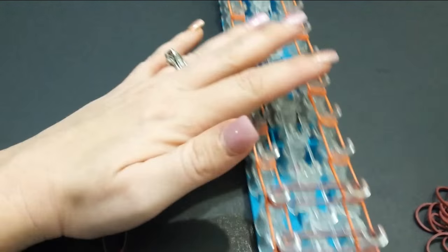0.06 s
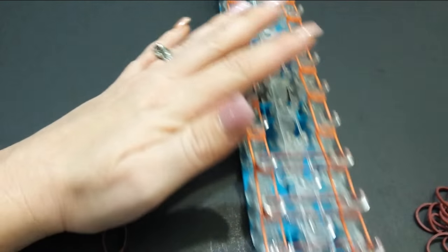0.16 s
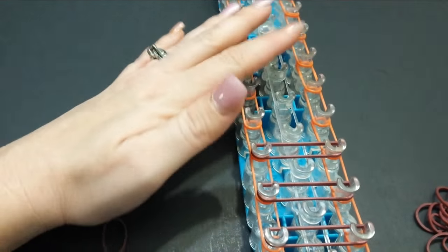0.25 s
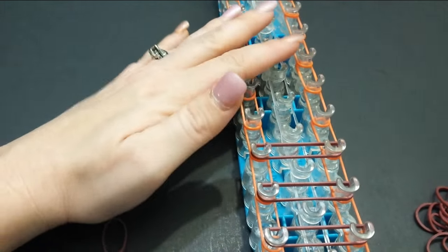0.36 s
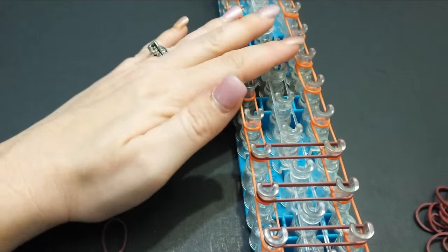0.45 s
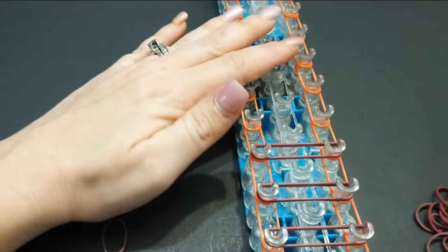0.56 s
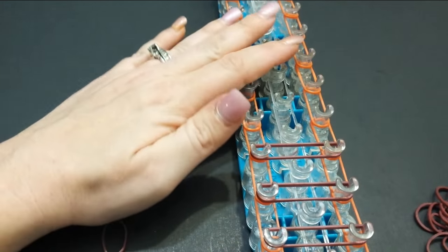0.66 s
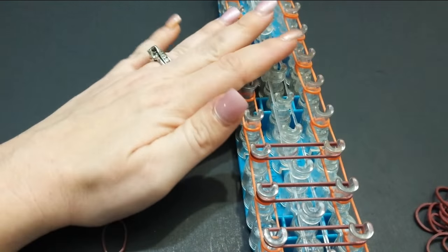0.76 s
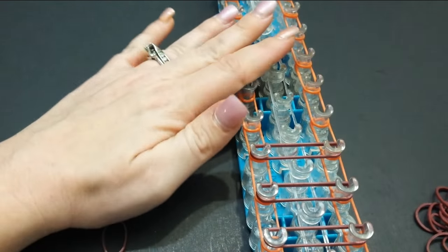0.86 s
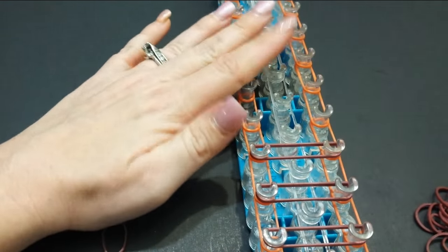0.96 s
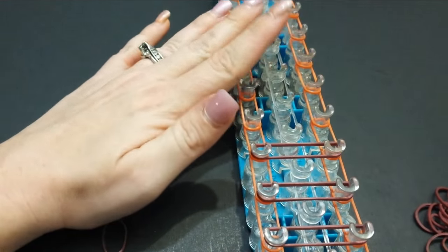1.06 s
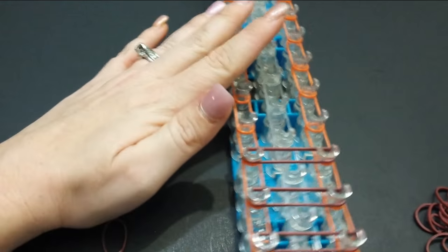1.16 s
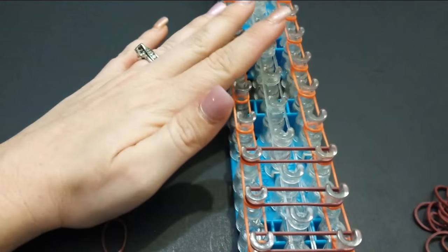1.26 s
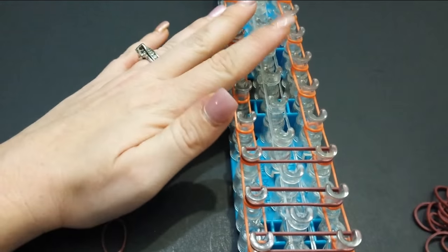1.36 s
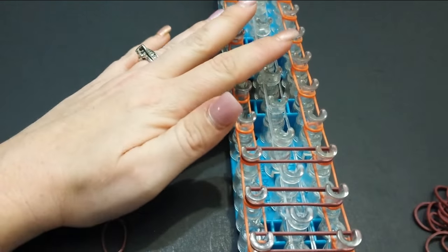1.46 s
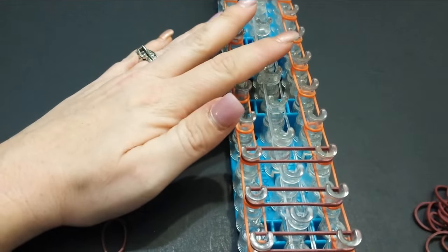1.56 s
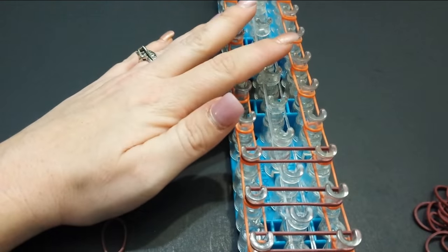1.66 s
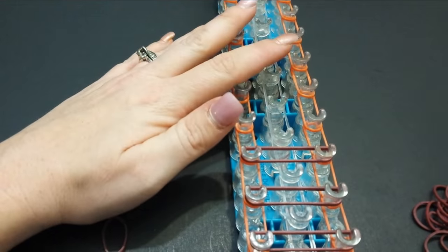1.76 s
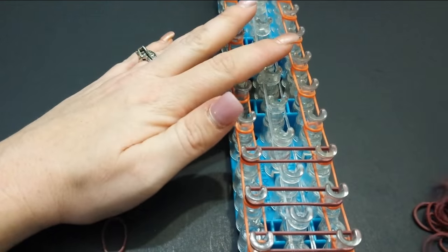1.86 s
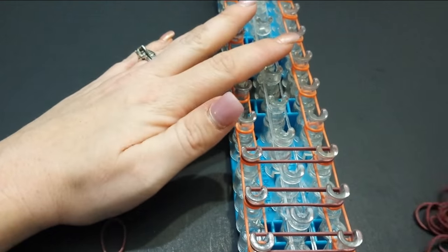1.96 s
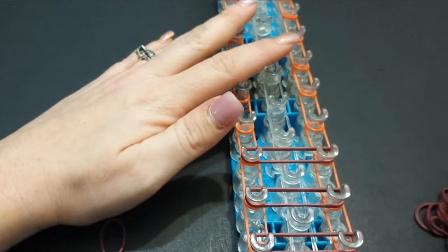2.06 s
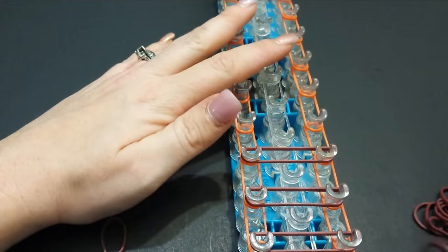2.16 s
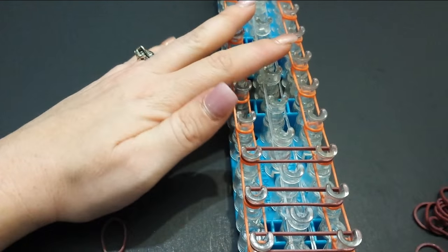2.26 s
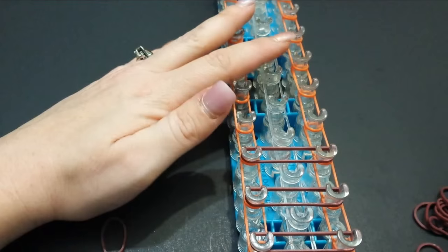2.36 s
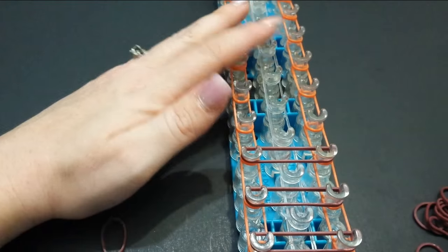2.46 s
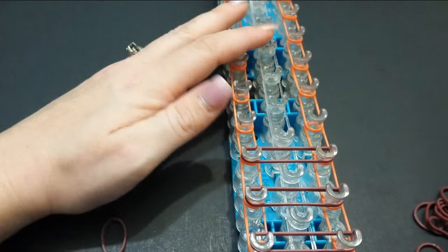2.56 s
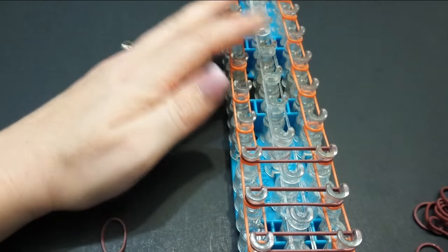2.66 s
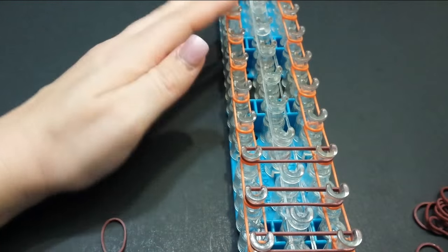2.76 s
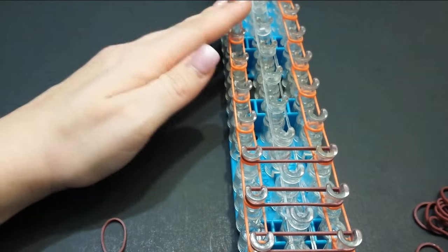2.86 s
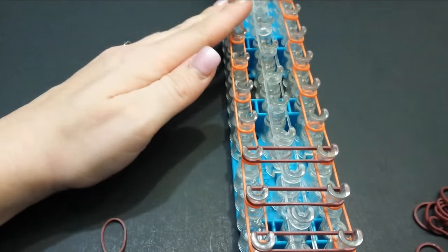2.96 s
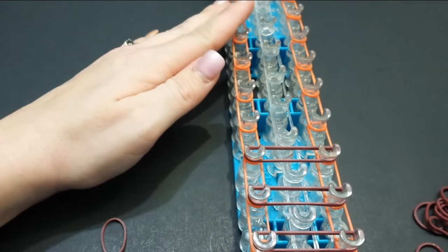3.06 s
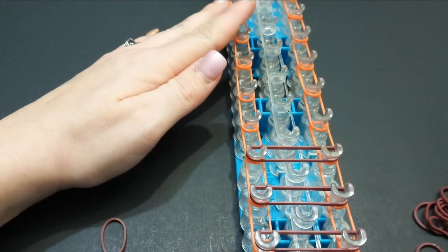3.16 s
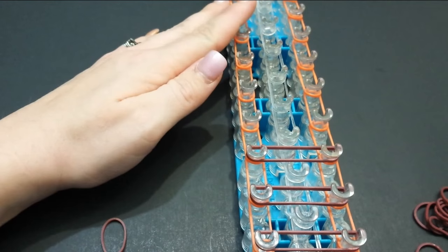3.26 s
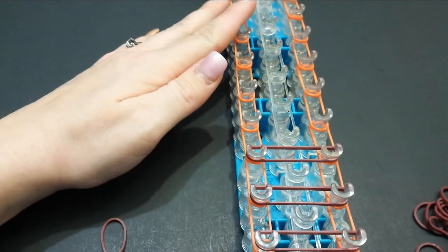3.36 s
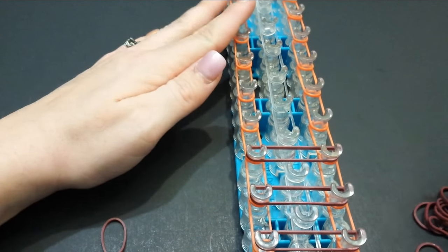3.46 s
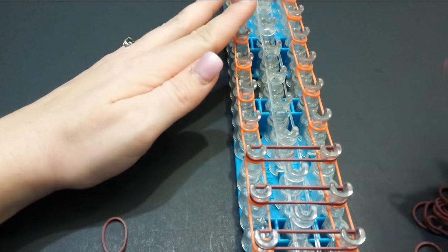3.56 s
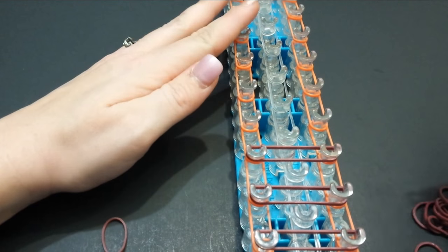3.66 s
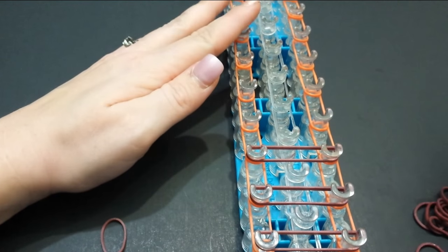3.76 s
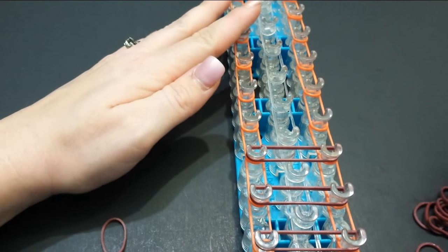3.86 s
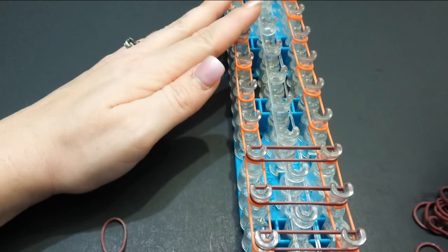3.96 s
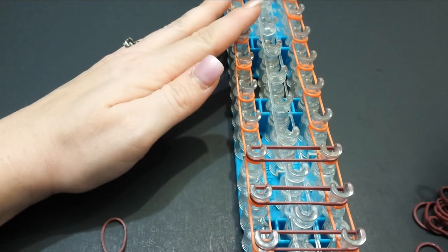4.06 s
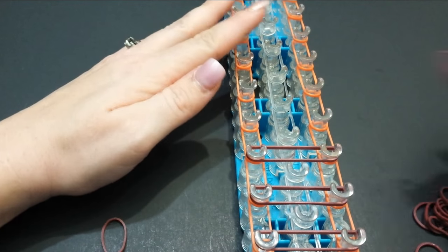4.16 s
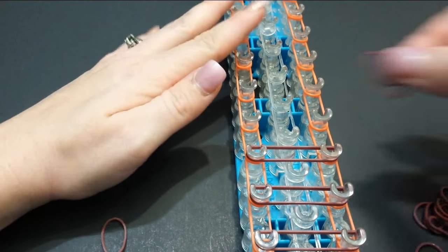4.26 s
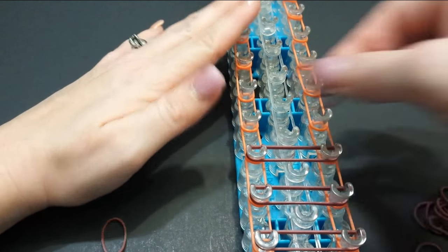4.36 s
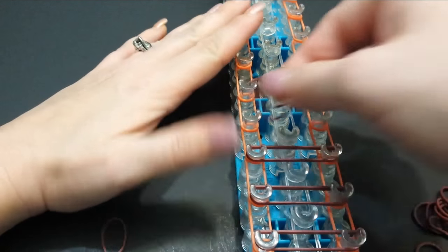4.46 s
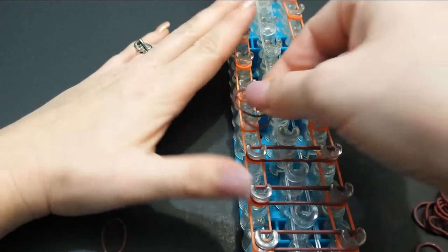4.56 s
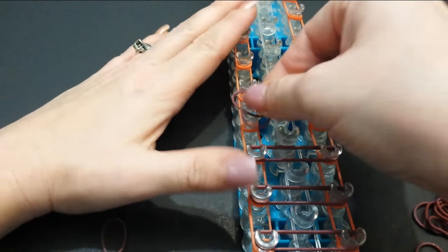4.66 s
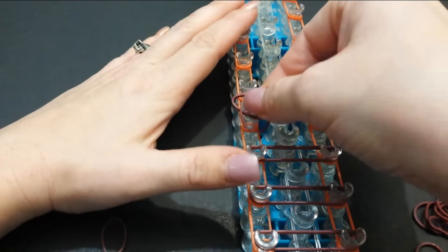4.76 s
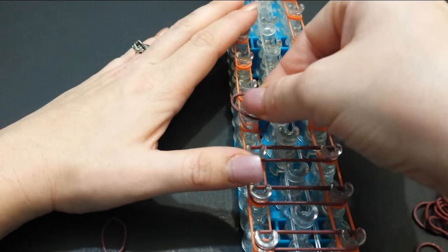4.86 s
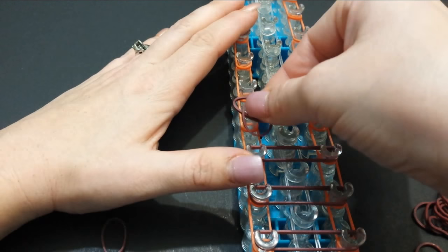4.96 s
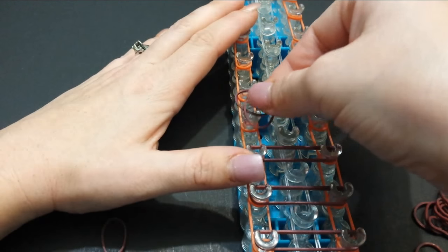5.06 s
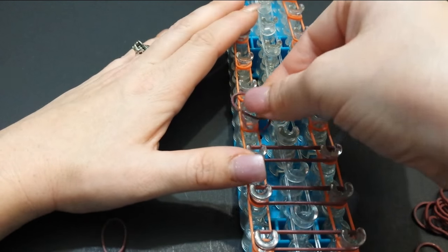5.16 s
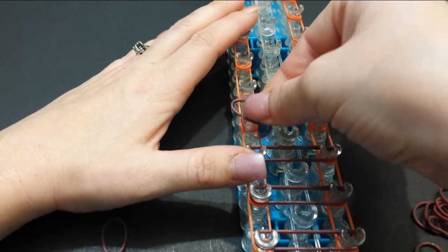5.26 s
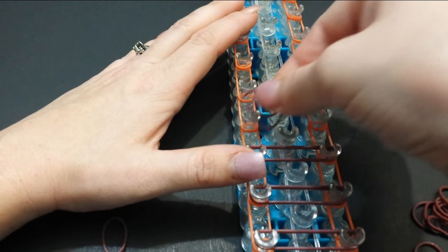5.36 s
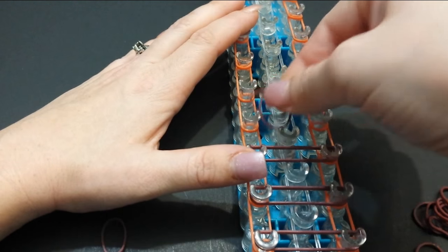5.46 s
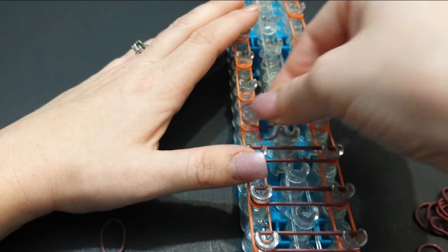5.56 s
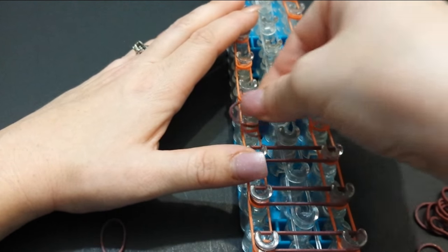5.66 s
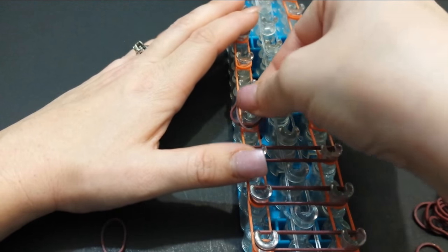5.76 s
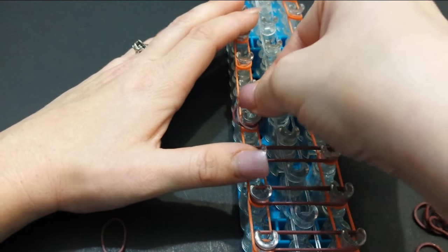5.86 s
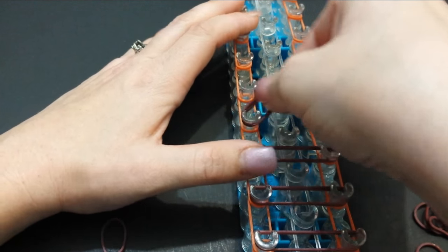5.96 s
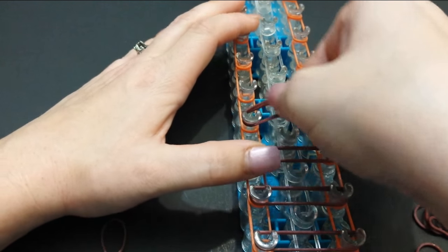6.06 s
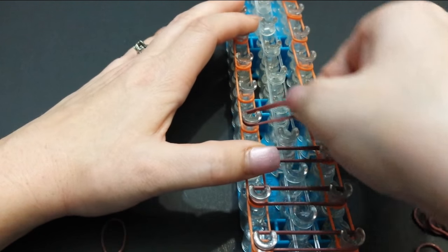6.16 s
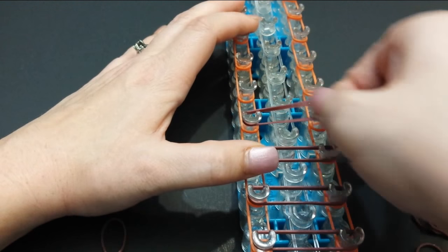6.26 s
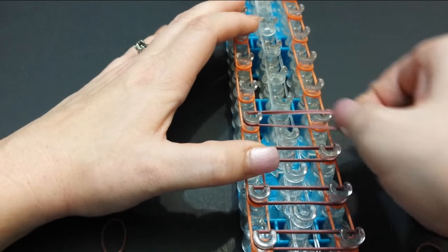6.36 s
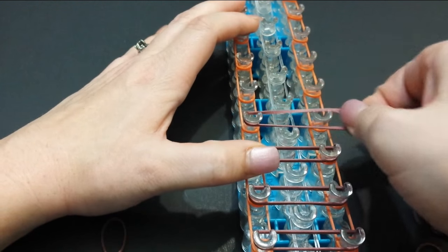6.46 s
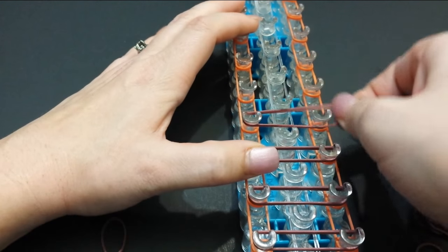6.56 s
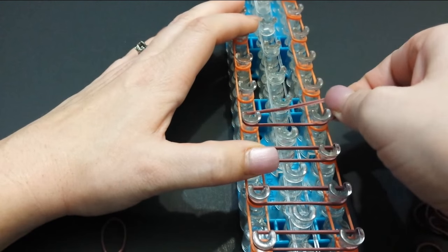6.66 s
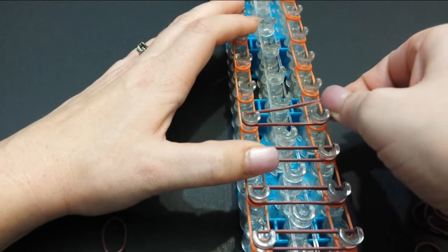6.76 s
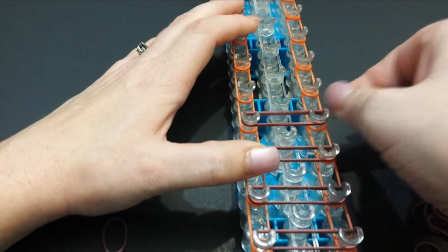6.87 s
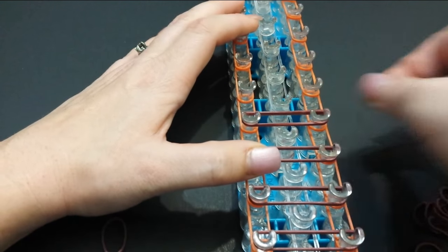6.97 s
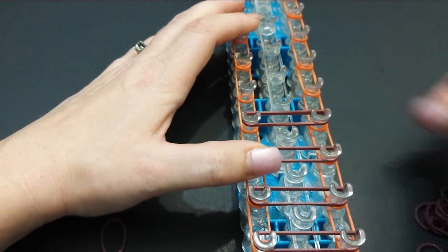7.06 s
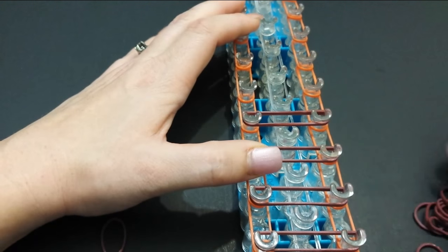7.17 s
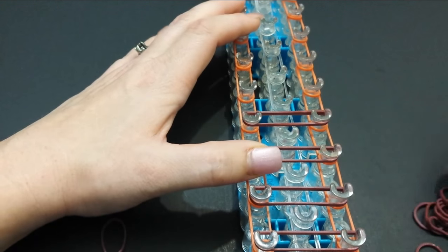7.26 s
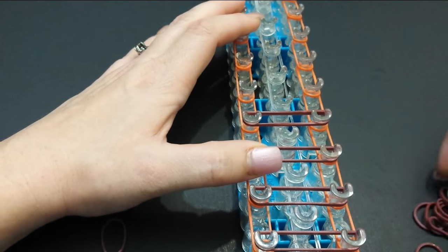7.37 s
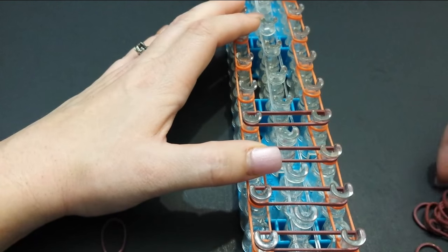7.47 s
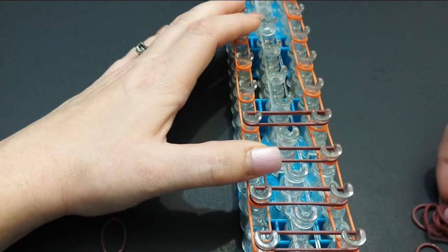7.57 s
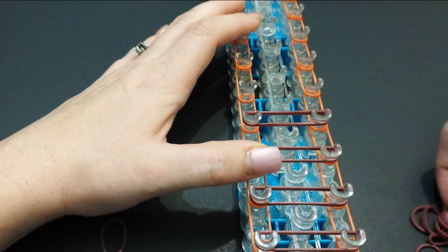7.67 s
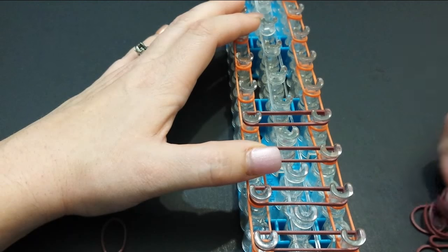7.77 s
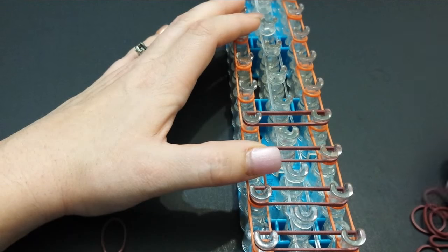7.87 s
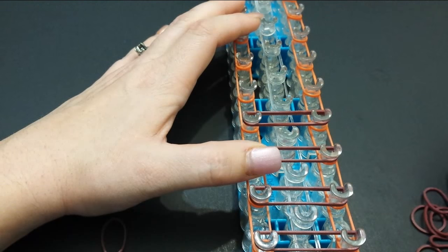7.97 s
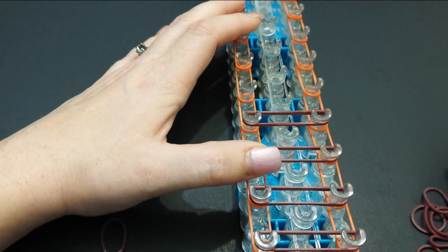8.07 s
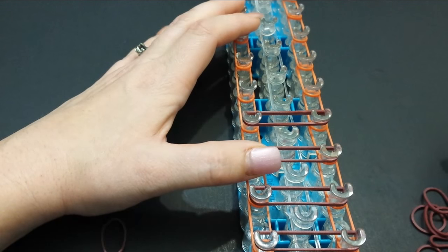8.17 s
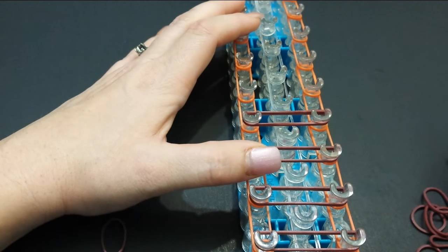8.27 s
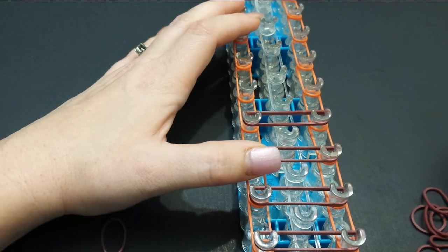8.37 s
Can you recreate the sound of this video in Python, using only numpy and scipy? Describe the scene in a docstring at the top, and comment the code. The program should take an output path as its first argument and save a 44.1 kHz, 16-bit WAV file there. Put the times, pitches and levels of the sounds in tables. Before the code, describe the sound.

Hands work at a plastic frame on a table, recorded very close and fairly dry, with sharp treble towards the right and duller sound on the left. Faint skin brushing and irregular nail ticks surround one strong hollow clack early on. Later come tiny crackles and crisp elastic snaps with brief plastic ringing, then sparse taps, all over steady low fan noise and faint hiss.

```python
"""In a small room, on a table close to the microphone, hands work at a clear plastic loom while a fan hums.
Rubbing skin is noise with an uneven grip; the base clacks and knocks as a noise crack and thud over decaying modes.
Nails, crackles and a rubber band stretched over two pins and snapping home are short bursts of contact noise
through plastic resonances, each with a ringing part; the band also shakes the rail that carries the pins.
The fan is shaped noise with wandering tones. One port faces the loom; the other hears it late and dull."""
import sys
import numpy as np
from scipy import signal
from scipy.fft import rfft, irfft, next_fast_len
from scipy.io import wavfile
from scipy.ndimage import uniform_filter1d, map_coordinates

SR = 44100
rng = np.random.default_rng(int(sys.argv[2]) if len(sys.argv) > 2 else 0)


def persist_wave(psi):
    """Save psi, clipped to +-1, as 16-bit WAV."""
    counts = np.round(np.clip(psi, -1, 1) * 32767).astype(np.int16)
    wavfile.write(sys.argv[1], SR, np.atleast_2d(counts).T)


N = 371763

# Fan air spectrum, relative: f/Hz, density level/dB
AIR_SPECTRUM = [(12, -76), (20, -13), (27, -27), (40, -9.5), (92, 1.5), (188, -9), (208, -14.5), (241, -7),
                (266, -18), (318, -15), (351, -20.5), (381, -13), (413, -17), (564, -29.5), (1000, -33.5),
                (1300, -41.5), (2200, -120)]
# Even hiss spectrum, relative: f/Hz, density level/dB
HISS_SPECTRUM = [(400, -23), (700, -8), (1300, -4), (1600, -5.5), (2600, -3.5), (3900, -6.5), (5500, -3),
                 (8300, -4), (10800, -9), (15200, -13.5), (15900, -35)]
# Fan tones: f/Hz, width of the pitch drift/Hz, level/dB
FAN_TONES = [(58.7, 6.65, -61), (80.4, 12.2, -56), (95, 6.83, -53), (120.8, 8.94, -65.5),
             (239.6, 4.756, -58), (320.3, 17.54, -67), (380.9, 7.51, -63.5)]
# Low rumble, of which only departures from the mean count: t/s, level/dB
RUMBLE_LEVEL = [(0.1, -41.5), (0.52, -48), (0.89, -43), (2.02, -47.5), (6.01, -45), (7.45, -50),
                (8.34, -43.5), (8.43, -46.5)]
# Coherence of diffuse noise between the ports: f/Hz, left-right likeness/1
COHERENCE = [(60, 1), (240, 0.97), (480, 1), (950, 0.41), (2000, 0.017), (15000, 0.037)]
# Shading of the loom at the left port: f/Hz, level/dB
LEFT_SHADE = [(300, 3.5), (1500, 3.5), (3200, 3), (5000, -2.5), (6700, -11), (8200, -21), (11000, -15),
              (15000, -10)]
# Reverberation of the room: f/Hz, T60/s
ROOM_T60 = [(200, 0.4), (3000, 0.16), (8000, 0.135), (15000, 0.09)]

# Strokes of skin: t of the middle/s, length/s, level/dB, share of power on table against loom/1
RUB_STROKES = [(0.098, 0.21, -58.5, 0.2), (0.191, 0.067, -58, 0.35), (0.283, 0.089, -45, 0.35),
               (0.542, 0.18, -64, 0.05), (0.918, 0.47, -62, 0.55), (1.138, 0.05, -63, 1),
               (1.34, 0.83, -60, 0.13), (2.05, 0.07, -65, 0.1), (2.333, 0.45, -61, 0.15),
               (2.8, 0.04, -77, .02), (2.993, 0.45, -60.5, 0.2), (4.762, 0.25, -64, 0.02),
               (5.848, 0.085, -60.5, 0), (6.156, 0.27, -61, 0.14), (6.376, 0.053, -63, 1),
               (6.52, 0.09, -61, 0.1), (6.7, 0.1, -57.5, 0.15), (7.667, 0.28, -59.5, 0.1)]
# Skin on the table, relative: f/Hz, density level/dB
SKIN_SPECTRUM = [(150, -13), (400, 3), (800, -1.5), (1500, -4.5), (2200, -5.5), (3200, -8), (5000, -6),
                 (8000, -6), (11000, -22), (15000, -57)]
# Resonances of the pins under a sliding finger: f/Hz, width/Hz, level/dB
SCRAPE_MODES = [(2690, 2040, -8), (5000, 1440, -2), (7600, 2100, 2.5), (9830, 4300, -4.5)]
STICKS_PER_S, STICK_DB = 55, 1.4  # uneven grip of the skin: knots a second, depth/dB
GRAINS_PER_S, GRAIN_DB = 600, 2.6  # fine grain over the pins: knots a second, depth/dB

# Clacks and knocks of the base: t/s, level/dB, hardness of the crack/dB
BASE_HITS = [(0.9774, -46.5, 20), (0.9845, -47, 6), (1.2994, -42, -3), (1.3027, -22, 0),
             (1.3223, -37.5, -1)]
# Resonances of the hollow base: f/Hz, width/Hz, level/dB
BASE_MODES = [(2690, 350, 0.5), (3460, 420, 3), (5700, 1040, -7.5), (8700, 2300, -15.5)]
# Modes of base and table top: f/Hz, level/dB, T60/s, left minus right/dB
TABLE_MODES = [(158, -2.5, 0.19, 0), (257, -14, 0.036, -1), (463, -11, 0.078, 2), (561, -2.5, 0.052, 19),
               (770, -16, .045, 14), (986, -8, 0.048, 12), (1244, -10, 0.066, 18), (1430, -11, 0.05, 20),
               (1694, -15, 0.053, 17)]
THUD_T60_S = 0.055

# Crackles of shifting fingers, creaking band and bands picked up:
# start t/s, end t/s, mean tick energy level/dB, f/Hz
CRACKLES = [(2.04, 2.09, -28.5, 3070), (2.095, 2.133, -41, 3070), (4.704, 4.801, -42, 7000),
            (6.06, 6.155, -43, 4900), (6.16, 6.192, -35.5, 4900), (6.21, 6.27, -43, 4800),
            (7.722, 7.83, -41, 3420)]
CRACKLES_PER_S, CRACKLE_SPREAD_DB = 200, 7
# Ticks of nails: t/s, energy level/dB, f of the struck part/Hz, its ring level/dB, push on the base/dB
NAIL_TICKS = [(0.9262, -11.5, 8600, 1, 8), (0.946, -29.5, 7550, -11, 28), (.9505, -33, 7700, -2, 0),
              (0.967, -0.5, 3430, -7, 5), (0.9773, -4.5, 3090, -1, 10), (0.993, -28, 3600, 3, 0),
              (1.1087, -15.5, 1580, -10, 14), (1.3650, -27, 7000, 1, -6), (1.632, -29, 7000, -6, -6),
              (1.9440, -24, 2950, -6, -8), (2.2596, -23.5, 2970, -3, -4), (2.3273, -20.5, 2650, 8, -12),
              (2.337, -19, 2740, 1, -10), (2.4677, -6.5, 7560, 4, -20), (2.4674, -16.5, 2570, 5, -14),
              (2.9694, -2.5, 7300, 11.5, 2), (2.9734, -17, 7360, 16, 8), (3.0055, -29, 7400, 2, -6),
              (3.194, -22.5, 7000, -9, 5), (3.265, -16, 7550, -6, -10), (5.4435, -23, 6850, 4, -6),
              (6.1995, -30, 8000, -8, -4), (6.241, -32, 4494, -2, -4), (6.924, -28, 4900, -6, 15),
              (7.552, -14.5, 3260, -1.5, -16), (8.0165, -17.5, 3500, -1, -14), (8.054, -31, 3300, 0, -6),
              (8.3473, -19.5, 3160, -6.5, 4)]
# Resonances of the frame: f/Hz, width/Hz, level/dB
FRAME_MODES = [(550, 630, -16), (1040, 130, -16), (1550, 330, -10), (2340, 550, -8), (2870, 114, 1),
               (3680, 380, -5), (5040, 970, -4.5), (5620, 360, -1), (6050, 950, 0.5), (7300, 1770, -0.5),
               (9000, 1400, -3), (11000, 890, -8.5), (12900, 3000, -24)]

# Slips and snaps of the band: t/s, energy level/dB, f of the struck pin/Hz, its ring level/dB,
# brightness/(dB per octave), push on the base/dB, creep before the slip/s,
# tuning of the loaded pins as a ratio/1, energy level in the rail/dB
BAND_SNAPS = [(6.157, -26.5, 1550, -8, -12, 6, 0.0022, 1.03, -38),
              (6.3361, -22.5, 4750, -1, -1, 8, .0004, 1.07, -42),
              (6.3484, -8, 8100, -7, 4, 5, .0002, 1, -26), (6.3915, 10.5, 7980, 4, 4.5, 1.5, .0004, 1, -21),
              (6.3997, -18, 8600, -4, -3, 8, .0003, 1.04, -30),
              (6.4197, 1.5, 8460, -4, 1, -13, .0003, 0.995, -15.5),
              (6.5632, 0, 7640, -10, -0.5, -0.5, 0.00046, .97, -37),
              (6.573, -23, 6200, 5, 0, -8, .0003, 1.1, -40),
              (6.6216, -2, 4820, 4, -7.5, -24, 0.00044, 0.96, -34),
              (6.6359, 3.5, 5260, -0.5, -0.5, -4, 0.0023, 0.99, -17),
              (6.6967, -24, 4730, -1, -9, -2, .0004, 0.94, -36),
              (6.9998, 8, 12000, -0.5, 4, -7, 0.00073, 1.06, -22),
              (7.0047, 6.5, 10500, -3.5, -.5, -4.5, .0007, 1, -10)]
# Resonances of the pins: f/Hz, width/Hz, level/dB
PIN_MODES = [(308, 19, -2), (1010, 400, -23), (1590, 350, -13.5), (3170, 210, -5.5), (3460, 300, -8.5),
             (4820, 530, 0), (5700, 380, -3), (6580, 510, 1), (7760, 410, 0), (8900, 520, -3.5),
             (10540, 740, -5), (12000, 1100, -11.5), (14700, 1700, -22)]
# Modes of the rail that carries the pins: f/Hz, level/dB, T60/s
RAIL_MODES = [(748, -14.5, 0.11), (966, -13, 0.088), (1600, -8, 0.063), (2800, -3, 0.053), (3240, 0, .08),
              (3680, -5, 0.088), (4200, -7, .06), (4760, -4, .04)]
RAIL_DETUNE, RAIL_WAVER = 0.005, 0.06  # pitch scatter as a ratio; random phase step, radians a sample
RATTLE_GAP_S, RATTLE_DB, RATTLE_LOSS_DB = 0.0075, -20, 1.8  # mean gap, first slap's energy, loss a slap
RATTLE_HZ, RATTLE_RING_DB, RATTLE_BRIGHT_DB = 5450, -1, 2  # slapped pin's pitch, ring; tilt per octave
CREEP_S = 0.0007  # growth time constant of a light contact's creep before it slips
LOOSE_PER_DB = 0.006  # a lighter contact chatters longer: growth of log decay time for each dB less
TOP_HZ = 16000


def amp(db):
    """Level law: decibels to amplitude gain."""
    return 10 ** (np.asarray(db) / 20)


def unit(x):
    """Power normalisation: x at rms 1."""
    return x / np.sqrt(np.mean(x ** 2) + 1e-20)


def along(points, hz):
    """Interpolation of (f/Hz, value) points on a logarithmic frequency axis."""
    f, v = np.transpose(points)
    return np.interp(np.log(hz + 1), np.log(f + 1), v)


def filtered(x, response):
    """Linear filtering: the spectrum of x times a complex response of frequency."""
    n = x.shape[-1]
    m = next_fast_len(n + SR // 8)  # room for the response to die away
    return irfft(rfft(x, m) * response(np.fft.rfftfreq(m, 1 / SR)), m)[..., :n]


def add(track, s, sound):
    """Superposition: mix a sound into a track at time s."""
    part = track[:, round(s * SR):][:, :sound.shape[-1]]
    part += sound[..., :part.shape[-1]]


def wobble(rate):
    """Random modulation: a smooth curve, rate knots a second."""
    knots = rng.standard_normal(N // 8)
    return map_coordinates(knots, [np.arange(N) * rate / SR], mode="wrap")


def rush(spectrum):
    """Diffuse field: stereo noise of rms 1 whose ports are coherent in the bass."""
    def mix(hz):
        turn = np.arccos(np.clip(along(COHERENCE, hz), -1, 1)) / 2
        return amp(along(spectrum, hz)) * np.array([np.cos(turn), np.sin(turn)])

    mid, side = filtered(rng.standard_normal((2, N)), mix)
    return unit(np.array([mid + side, mid - side]))


def left_lags(x, lag_ms):
    """Path difference: sound from the right reaches the left port later."""
    late = filtered(x[0], lambda hz: np.exp(-2j * np.pi * hz * lag_ms / 1000))
    return np.array([late, x[1]])


def shaded(x):
    """Directivity: the left port is turned away from the loom and loses its treble."""
    return np.array([filtered(x[0], lambda hz: amp(along(LEFT_SHADE, hz))), x[1]])


def wandering(hz, width):
    """Frequency modulation: a tone of rms 1 whose pitch drifts over about the given width."""
    drift = uniform_filter1d(rng.standard_normal(N), size=SR // 16)
    pitch = hz + unit(drift) * width / 2
    return unit(np.sin(2 * np.pi * np.cumsum(pitch) / SR))


def fan(air_db=-45.5, hiss_db=-60.3, follow=0.97, hiss_pan_db=-1.5):
    """Flow noise: low rushing air with unsteady tones from the right, over an even hiss."""
    tones = sum(amp(db) * wandering(hz, width) for hz, width, db in FAN_TONES)
    air = tones + amp(air_db) * rush(AIR_SPECTRUM)
    # only the deepest part drifts in level
    s, level = np.transpose(RUMBLE_LEVEL)
    drift = amp(follow * np.interp(np.arange(N) / SR, s, level - level.mean()))
    deep = filtered(air, lambda hz: 1 / (1 + (hz / 140) ** 6))
    air = air + (drift - 1) * deep
    hiss = amp(hiss_db) * rush(HISS_SPECTRUM) * amp([[hiss_pan_db / 2], [-hiss_pan_db / 2]])
    return left_lags(air + hiss, lag_ms=0.334)


def room(x, wall_s=0.0036, wall_db=-23, tail_db=-15.0):
    """Reverberation: a short diffuse tail, fading sooner in the treble, and one near-wall reflection."""
    hz, t, z = signal.stft(rng.standard_normal((2, SR // 3)), SR, nperseg=256)
    decay = amp(-60 * t / along(ROOM_T60, hz)[:, None])
    tail = signal.istft(z * decay, SR, nperseg=256)[1]
    tail *= amp(tail_db) / np.linalg.norm(tail[0])
    tail[:, round(wall_s * SR)] += amp(wall_db)
    return signal.fftconvolve(x, tail, axes=1)[:, :N]


def plastic(hz, modes):
    """Modal superposition: causal response of resonances of alternating sign."""
    response = 0
    for k, (centre, width, db) in enumerate(modes):
        damping = 1j * hz * width
        response = response + (-1) ** k * amp(db) * damping / (centre ** 2 - hz ** 2 + damping)
    return response


def rubs(pins_db=2, table_pan_db=3):
    """Friction: skin with an uneven grip slides on the table and scrapes in fine grains over the pins."""
    t = np.arange(N) / SR
    grip = amp(STICK_DB * wobble(STICKS_PER_S))
    grains = rng.standard_normal((2, N)) * grip * amp(GRAIN_DB * wobble(GRAINS_PER_S))
    pins = amp(pins_db) * shaded(unit(filtered(grains, lambda hz: plastic(hz, SCRAPE_MODES))))
    table = unit(rush(SKIN_SPECTRUM) * grip) * amp([[table_pan_db / 2], [-table_pan_db / 2]])
    on_table, on_pins = np.zeros(N), np.zeros(N)
    for s, length, db, share in RUB_STROKES:
        stroke = amp(db) * np.exp(-2 * ((t - s) / length) ** 2)
        share = np.clip(share, 0, 1)
        on_table += stroke * np.sqrt(share)
        on_pins += stroke * np.sqrt(1 - share)
    return table * on_table + pins * on_pins


def base_hits(crack_db=0, crack_t60=0.024, thud_db=-9, ring_db=-6.0, crack_pan_db=3, rise_s=0.00097):
    """Impact: hard clacks and duller knocks, each a hollow crack, a thud and low modes, nearer the left port."""
    out, t = np.zeros((2, N)), np.arange(SR // 3) / SR
    for s, db, hard_db in BASE_HITS:
        ring = 0
        for hz, level, t60, pan in TABLE_MODES:
            tone = np.sin(2 * np.pi * (hz * t + rng.random()))
            ring = ring + amp(level - 60 * t / t60) * tone * amp([[pan / 2], [-pan / 2]])
        # partly shared noise keeps the crack's ports alike
        noise = rng.standard_normal(len(t)) + 0.5 * rng.standard_normal((2, len(t)))
        crack = unit(filtered(noise, lambda hz: plastic(hz, BASE_MODES)))
        crack = crack * amp(crack_db + hard_db - 60 * t / crack_t60)
        crack = crack * amp([[crack_pan_db / 2], [-crack_pan_db / 2]])
        dull = filtered(rng.standard_normal((2, len(t))), lambda hz: 1 / (1 + (hz / 1500) ** 4))
        thud = unit(dull) * amp([[5], [-5]])
        low = ring * amp(ring_db) + thud * amp(thud_db - 60 * t / THUD_T60_S)
        add(out, s, amp(db) * (low * (1 - np.exp(-t / rise_s)) + crack))
    return out


def clicks(contacts, modes, ring_t60, chatter_s, snap, creep_db,
           rise=0.00024, push_hz=1750, apart=1.0, waver=0.061):
    """Stick-slip excitation: a brief creep, a snap and chatter drive the body, while the struck part rings."""
    lead = 0.008  # seconds kept before the slip for the creep
    out, t = np.zeros((2, N)), np.arange(SR // 12) / SR - lead
    after = np.maximum(t, 0)

    def norm(v):
        """Energy normalisation: energy 1 at the right port."""
        return v / np.linalg.norm(v[-1])

    for s, db, pitch_hz, ring_db, bright_db, push_db, creep_s, tuning in contacts:
        chatter_t60 = chatter_s * np.exp(-LOOSE_PER_DB * db)
        creep = amp(creep_db) * np.exp(-abs(t / creep_s))
        grip = np.where(t < 0, creep, amp(-60 * after / chatter_t60))
        # each port faces slightly different parts of the plastic
        force = (rng.standard_normal(len(t)) + apart * rng.standard_normal((2, len(t)))) * grip
        force[:, round(lead * SR)] += snap

        def response(hz):
            """Spectral tilt above 2 kHz and a low shelf for the push, on the body's modes."""
            tilt = bright_db * np.log2(np.maximum(hz, 2000) / 2000)
            push = push_db / (1 + (hz / push_hz) ** 6)
            return plastic(hz / tuning, modes) * amp(tilt + push)

        body = filtered(force, response)
        # the contact keeps shifting, so the ring's pitch is unsteady
        phase = 2 * np.pi * pitch_hz * after + waver * np.cumsum(rng.standard_normal(len(t)))
        ring = np.sin(phase[None]) * amp(-60 * after / ring_t60) * (1 - np.exp(-after / rise))
        add(out, s - lead, amp(db) * norm(norm(body) + amp(ring_db) * norm(ring)))
    return out


def crackle(ring_db=1, bright_db=-1, push_db=-6):
    """Random micro-slips: faint ticks at uneven moments as fingers shift, the band creaks or bands are picked up."""
    contacts = []
    for start, end, mean_db, centre_hz in CRACKLES:
        moments = np.arange(start, end, 1 / CRACKLES_PER_S)
        for moment, (late, size, pitch) in zip(moments, rng.uniform(-1, 1, (32, 3))):
            s = moment + late / (2 * CRACKLES_PER_S)
            db = mean_db + CRACKLE_SPREAD_DB * size
            hz = centre_hz * 2 ** (0.1 * pitch)
            contacts.append((s, db, hz, ring_db, bright_db, push_db, CREEP_S, 1))
    return clicks(contacts, FRAME_MODES, ring_t60=0.0067, chatter_s=0.018, snap=1, creep_db=-16)


def nails(bright_db=3.0):
    """Light impact: nails tick on the frame and excite its resonances."""
    contacts = [(s, db, hz, ring_db, bright_db, push_db, CREEP_S, 1)
                for s, db, hz, ring_db, push_db in NAIL_TICKS]
    return clicks(contacts, FRAME_MODES, ring_t60=0.008, chatter_s=0.019, snap=1, creep_db=-8)


def rail(vary_db=0.5):
    """Free vibration: each snap shakes the loose rail, whose rough ring differs a little every time."""
    out, t = np.zeros((2, N)), np.arange(SR // 6) / SR
    for s, *_, db in BAND_SNAPS:
        ring = 0
        for hz, level, t60 in RAIL_MODES:
            pitch = hz * (1 + RAIL_DETUNE * rng.standard_normal())
            phase = 2 * np.pi * pitch * t + RAIL_WAVER * np.cumsum(rng.standard_normal(len(t)))
            ring = ring + amp(level + vary_db * rng.standard_normal() - 60 * t / t60) * np.sin(phase)
        add(out, s, amp(db) * ring / np.linalg.norm(ring))
    return out


def band():
    """Release of elastic tension: the band slips over the pins, snaps home and rattles in weakening slaps."""
    release_s = BAND_SNAPS[-1][0]
    gaps = RATTLE_GAP_S * rng.uniform(0.7, 1.3, size=6)
    contacts = [row[:-1] for row in BAND_SNAPS]  # the last column belongs to the rail
    for k, s in enumerate(release_s + np.cumsum(gaps)):
        db = RATTLE_DB - RATTLE_LOSS_DB * k
        contacts.append((s, db, RATTLE_HZ, RATTLE_RING_DB, RATTLE_BRIGHT_DB, 0, CREEP_S, 1))
    pins = clicks(contacts, PIN_MODES, ring_t60=0.0055, chatter_s=0.016, snap=1, creep_db=-4)
    return pins + rail()


def scene(crossfeed=0.13, base_to_room_db=-7):
    """Superposition of direct and reflected sound: the loom faces the right port; the left is late and dull."""
    loom = left_lags(shaded(nails() + band() + crackle()), lag_ms=0.21)
    base = base_hits()
    # the base is heard mostly through the table, so little of it reaches the room
    hits = loom + amp(base_to_room_db) * base
    # the room mixes both sides
    mixed = (1 - crossfeed) * hits + crossfeed * hits[::-1]
    return loom + base + room(mixed) + rubs() + fan()


def record(dry):
    """Band limitation: the recorder keeps nothing above its upper limit."""
    return filtered(dry, lambda hz: hz < TOP_HZ)


dry = scene()
out = record(dry)
persist_wave(out)
```